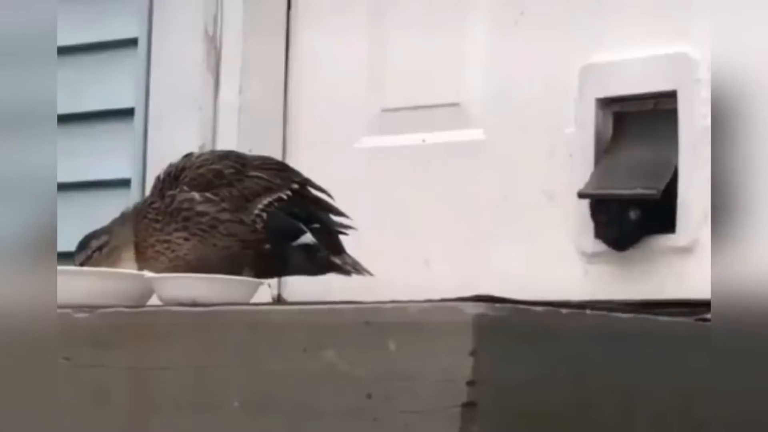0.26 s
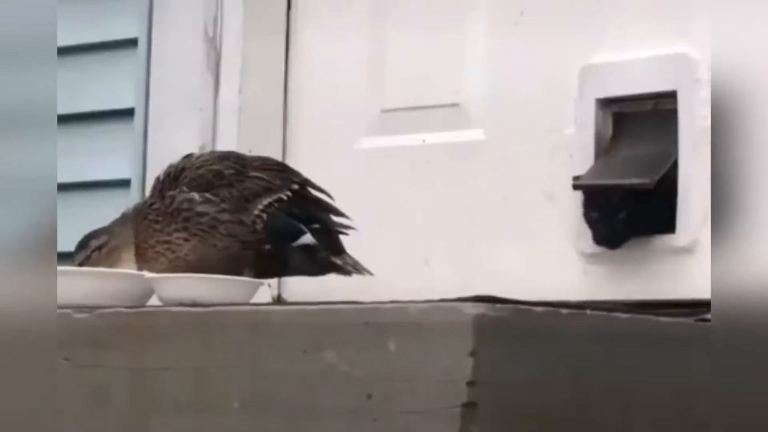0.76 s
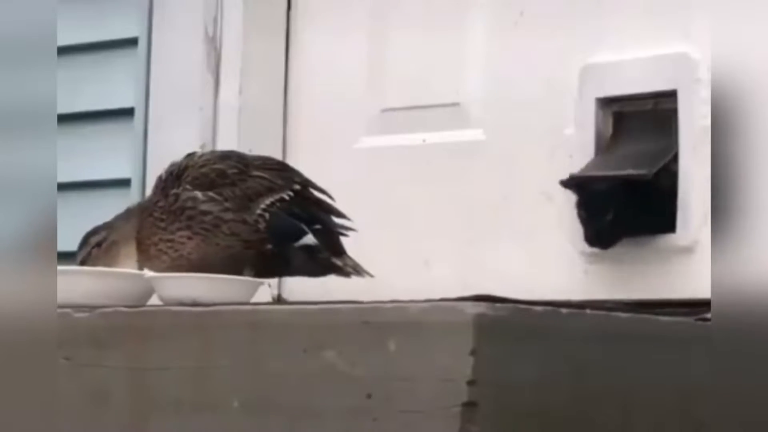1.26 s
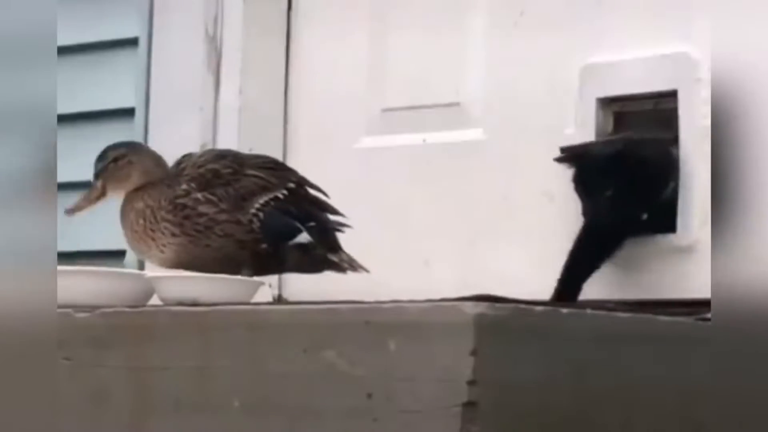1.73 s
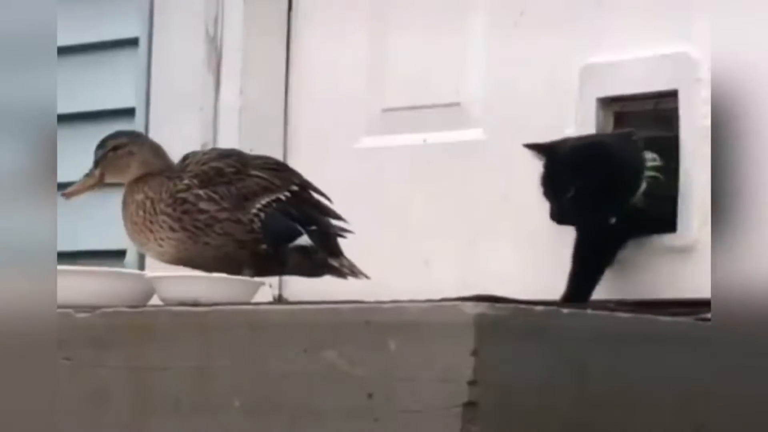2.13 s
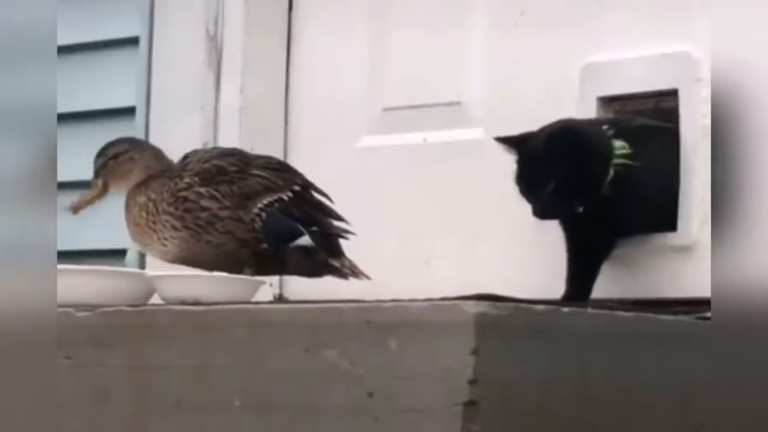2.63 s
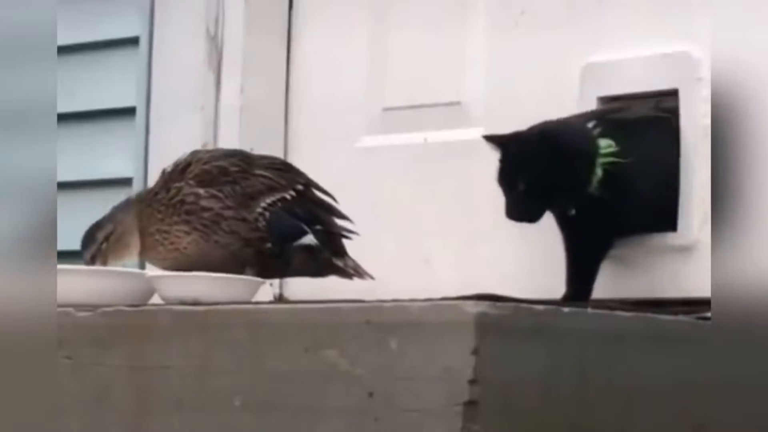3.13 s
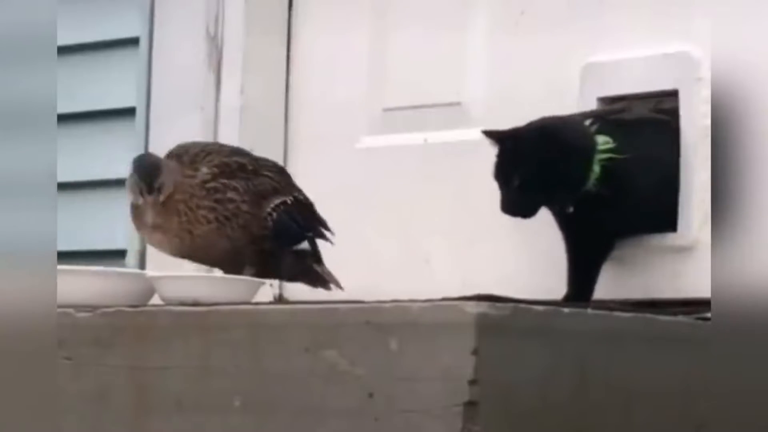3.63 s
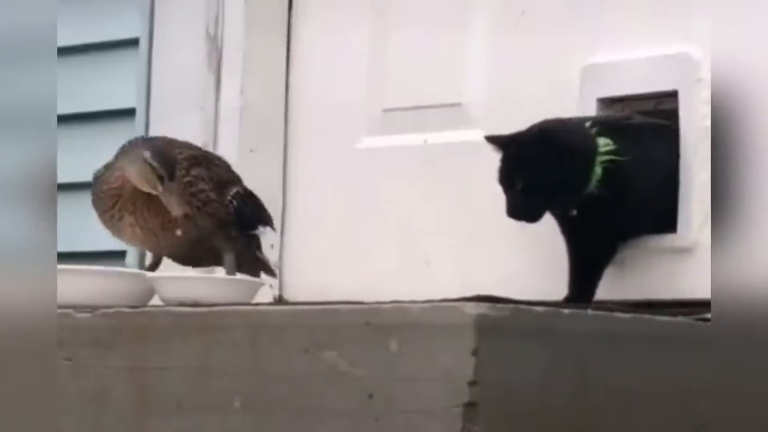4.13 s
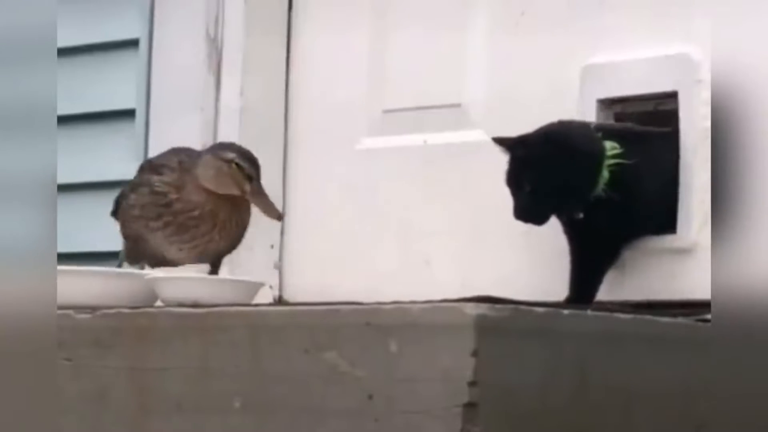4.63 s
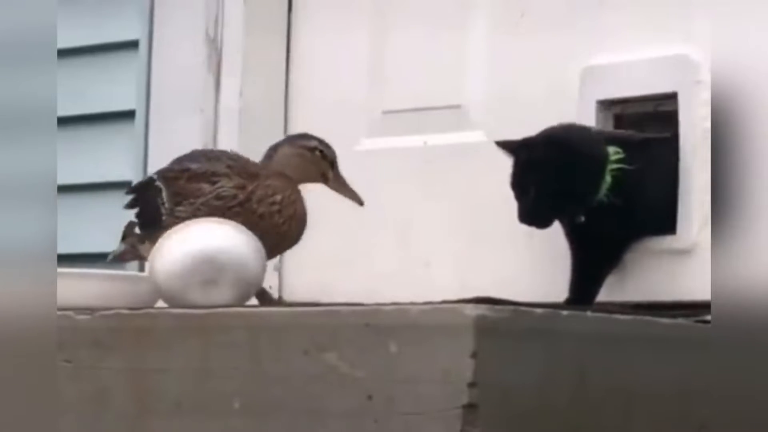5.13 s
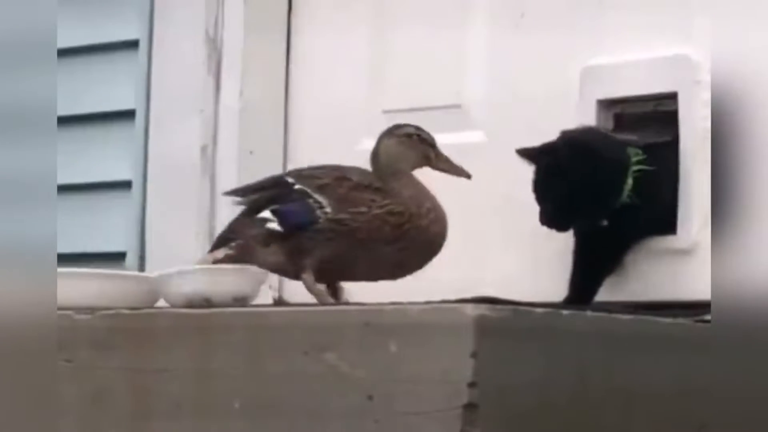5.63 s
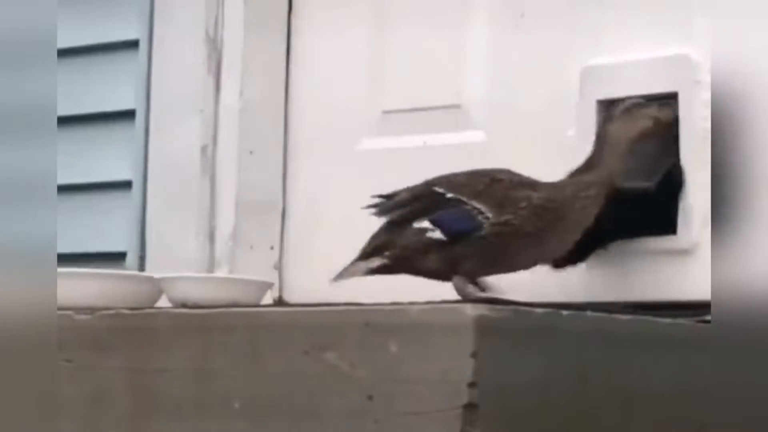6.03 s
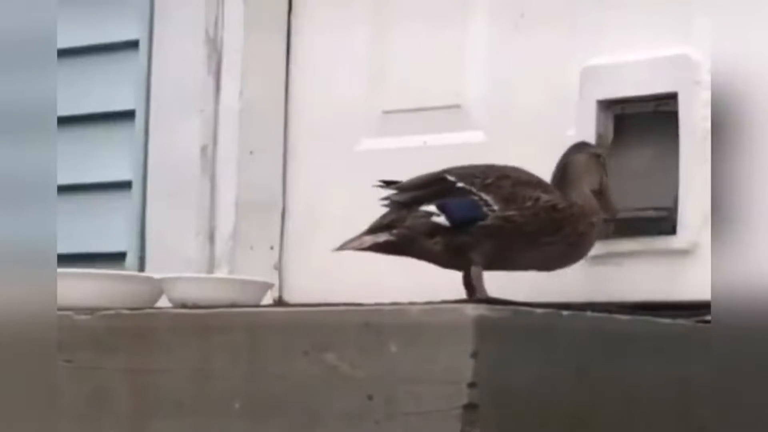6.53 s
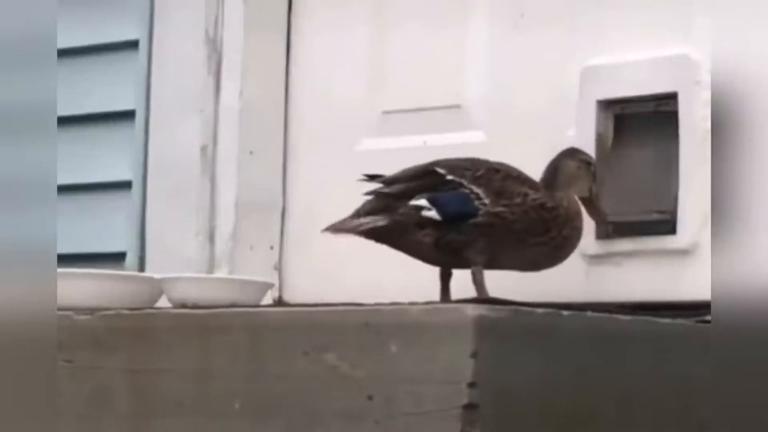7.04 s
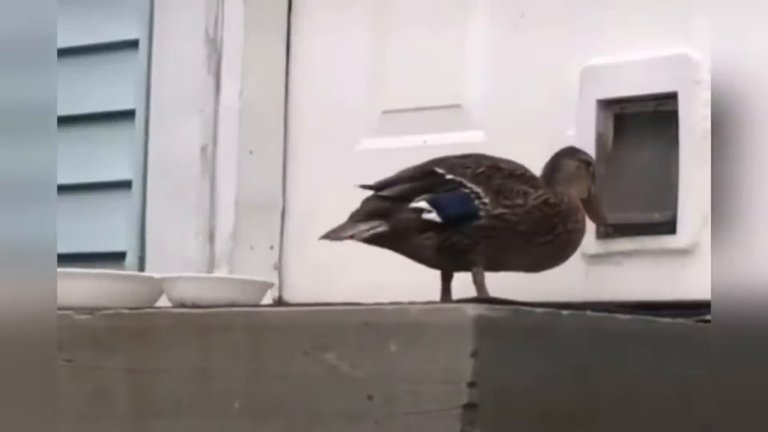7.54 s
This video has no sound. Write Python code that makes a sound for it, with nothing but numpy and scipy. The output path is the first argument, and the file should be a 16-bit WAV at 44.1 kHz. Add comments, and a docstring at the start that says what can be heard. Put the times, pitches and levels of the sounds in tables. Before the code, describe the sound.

Faint dabbling and soft dull taps come first, with a clean rising bird chip nearby and weaker calls farther off. Then a steel bowl is tipped and lands with a loud ringing clatter on the step. Heavy, flappy footsteps run forward, a collar tag tinkles, and a plastic pet door bangs and rattles with a low door thump. It settles into quiet outdoor rumble with small knocks. Close and nearly mono, with a little porch reflection.

```python
"""A duck dabbles in a steel bowl on a porch, treads on its rim so that it clangs and rolls, then runs at a cat.
The cat backs in through its plastic flap, which knocks shut in the door; the duck pecks at it.
A small bird chips nearby and others call farther off, over a low outdoor rumble and thin hiss.
Bowl, door and tag are damped modes, blows are bursts of coloured grains, rubbing is patchy noise,
and bird calls are gliding tones; random tails give the echoes of porch and yard."""
import sys
import numpy as np
from scipy import signal
from scipy.fft import rfft, irfft, next_fast_len
from scipy.io import wavfile
from scipy.ndimage import uniform_filter1d, map_coordinates

SR = 44100
rng = np.random.default_rng(int(sys.argv[2]) if len(sys.argv) > 2 else 0)


def generate_wav(sig):
    """Save sig (samples, or channels by samples) to the path in sys.argv[1] as 16-bit PCM at SR."""
    pcm = np.round(np.clip(np.atleast_2d(sig).T, -1, 1) * 32767).astype(np.int16)
    wavfile.write(sys.argv[1], SR, pcm)


N = 342921
T = np.arange(int(.7 * SR)) / SR  # time axis of one event [s]

# colour of blows on the bowl and the step: (frequency [Hz], gain [dB])
STEP_COLOUR = [(59, -32), (100, 2), (240, -2.5), (433, -9.5), (766, -5.5), (1380, -10.5), (2000, -15.5),
               (3460, -14.5), (4700, -23), (10800, -34), (13000, -41)]
# echo of the birds among the houses: (frequency [Hz], decay by 60 dB [s])
YARD_DECAY = [(2500, 0.14), (7000, 0.22), (13000, 0.3)]
# the cat rubbing along the frame: (time [s], length [s], relative level [dB])
SCUFF_STROKES = [(5.984, 0.061, -47.5), (6.03, 0.065, -54), (6.106, 0.075, -58), (6.184, 0.056, -55),
                 (6.222, 0.082, -50.5), (6.284, 0.11, -58.5)]
# colour of fur and claws on the frame: (frequency [Hz], gain [dB])
FUR_COLOUR = [(120, -18), (200, -1), (471, -10), (1150, -1), (1520, -5.5), (2840, -12), (3570, -5.5),
              (6460, -25), (7830, -18), (13000, -25)]


def amp(db):
    """Decibels to gain."""
    return 10 ** (np.asarray(db) / 20)


def unit(x):
    """Scale to rms 1."""
    return x / np.sqrt(np.mean(x ** 2) + 1e-20)


def along(points, hz):
    """Read (Hz, value) points on a log frequency axis."""
    f, v = np.transpose(points)
    return np.interp(np.log(hz + 1), np.log(f + 1), v)


def add(track, s, sound):
    """Mix a sound into the track at time s."""
    part = track[round(s * SR):][:len(sound)]
    part += sound[:len(part)]


def fade(t60):
    """Exponential decay, 60 dB in t60 seconds."""
    return np.exp(-np.log(1000) * T / max(t60, 1e-3))


def filtered(x, response):
    """Multiply the spectrum of x by a response of frequency."""
    m = next_fast_len(N + SR // 4)
    spectrum = rfft(x, m) * response(np.fft.rfftfreq(m, 1 / SR))
    return irfft(spectrum, m)[..., :N]


def noise(response):
    """Coloured noise of rms 1."""
    return unit(filtered(rng.standard_normal(N), response))


def wobble(rate):
    """A smooth random curve, rate knots a second."""
    knots = rng.standard_normal(int(N * rate / SR) + 4)
    return map_coordinates(knots, [np.arange(N) * rate / SR])


def patchy(x, db, bins, frames):
    """Give a noise patches of random gain in pitch and time."""
    z = signal.stft(x, nperseg=256)[2]
    field = uniform_filter1d(rng.standard_normal(z.shape), size=bins, axis=0)
    field = unit(uniform_filter1d(field, size=frames, axis=1))
    return unit(signal.istft(z * amp(db * field), nperseg=256)[1][:N])


def rub(response, catch_db, size=260, patchy_db=3):
    """Friction noise that catches and slips every few milliseconds, changing colour as it does."""
    catches = amp(catch_db * unit(uniform_filter1d(rng.standard_normal(N), size=size)))
    return unit(catches * patchy(noise(response), patchy_db, 5, 4))


def strokes(rows):
    """Level of rubbing strokes that swell and fade."""
    level = np.zeros(N)
    for s, length, db in rows:
        add(level, s, amp(db) * np.sin(np.pi * T[T < length] / length))
    return level


def ring(modes, hold=0):
    """Damped modes that die once the drive stops."""
    free = np.maximum(T - hold, 0)
    return sum(amp(db - 60 * free / t60) * np.sin(2 * np.pi * hz * T) for hz, db, t60 in modes)


def causal(gain):
    """The minimum-phase response with this gain: nothing sounds before the blow."""
    cepstrum = irfft(np.log(np.maximum(gain, 1e-6)))
    half = len(cepstrum) // 2
    cepstrum[1:half] *= 2
    cepstrum[half + 1:] = 0
    return np.exp(rfft(cepstrum))


def contacts(rows, colour, grit, thud_hz, snap_hz, ripple_db=4.0, ripple_hz=300, size=8192,
             grain_db=4, grain_hz=900):
    """Each contact is a push and a dying, grainy crunch, shared among thud, knock and snap."""
    track, hz = np.zeros(N), np.fft.rfftfreq(size, 1 / SR)
    low = 1 / (1 + (hz / thud_hz) ** 6)
    high = 1 - 1 / (1 + (hz / snap_hz) ** 6)
    weights = (low, (1 - low) * (1 - high), high)
    bands = np.array([causal(amp(along(colour, hz)) * weight) for weight in weights])
    for s, db, thud_db, snap_db, t60 in rows:
        knots = rng.standard_normal(size)
        grains = unit(amp(grain_db * np.interp(T[:size] * grain_hz, np.arange(size), knots)))
        force = grit * grains * rng.standard_normal(size) * fade(t60)[:size]
        force[0] += 1
        # each spot that is struck favours other resonances
        ripple = map_coordinates(rng.standard_normal(size), [hz / ripple_hz], order=1)
        parts = irfft(rfft(force) * causal(amp(ripple_db * ripple)) * bands)
        parts /= np.abs(parts).max(axis=1, keepdims=True)
        add(track, s, amp(db + np.array([thud_db, 0, snap_db])) @ parts)
    return track


def taps(rows, thud_db, t60, cushion):
    """Contacts from (s, dB, hardness dB): a hard one snaps, a soft one thuds."""
    return [(s, db, thud_db - cushion * hard_db, hard_db, t60) for s, db, hard_db in rows]


def porch(x, wet_db, width, decay=None):
    """Walls and yard answer with a decaying noise tail, almost alike at both microphone ports."""
    # echo of the porch: (frequency [Hz], decay by 60 dB [s])
    porch_decay = [(150, 1), (1000, 0.2), (7000, 0.18), (13000, 0.067)]
    if decay is None:
        decay = porch_decay
    hz, t, z = signal.stft(rng.standard_normal((2, SR // 2)), SR, nperseg=256)
    dying = amp(-60 * t / along(decay, hz)[:, None])
    mid, side = signal.istft(z * dying, SR, nperseg=256)[1]
    tails = np.array([mid + width * side, mid - width * side]) / np.linalg.norm(mid)
    return x + amp(wet_db) * signal.fftconvolve(x[None], tails, axes=1)[:, :N]


def spread(pair):
    """Turn the phase of the treble opposite ways at the two ports."""
    # close sounds reach the two ports out of step: (frequency [Hz], phase turn [dB re 1 radian])
    port_phase = [(3000, -63), (4300, -20.5), (7200, -10), (12000, -10.5)]
    return filtered(pair, lambda hz: np.exp(1j * np.outer([1, -1], amp(along(port_phase, hz)))))


def outdoors(split_hz=550, rumble_db=-58.5, hiss_db=-67, side_db=-15, wander_db=1.5):
    """Distant rumble and drone; a thin, patchy hiss lies above, with some side noise from about 4 to 8 kHz."""
    # colours of the rumble and of the hiss: (frequency [Hz], gain [dB])
    air_colour = [(15, -56), (25, -19.5), (37, -16.5), (59, -5), (75, -1), (97, -4.5), (202, -7.5),
                  (271, -14), (593, -19), (636, -14), (694, -17), (1600, -28.5), (2080, -60), (3520, -120)]
    hiss_colour = [(210, -35), (350, -6), (389, -2), (594, -9.5), (641, 1), (691, -10.5), (780, -8),
                   (1540, -15), (2660, -19), (2910, -18.5), (5740, -25), (10700, -25.5), (13000, -29)]
    side_colour = [(3300, -37.5), (4400, 6.0), (7800, 4.5), (9500, -17.0), (13000, -10.0)]
    # distant machinery: (frequency [Hz], half width [Hz], level [dB]); the first row also swells
    machinery = [(73, 8.6, -68.5), (635, 29, -81.5)]
    # the low drone swells once: (time [s], half length [s], rise [dB])
    drone_swell = (2.9, 0.77, 7)

    def low(hz):
        return 1 / np.sqrt(1 + (hz / split_hz) ** 6)

    rumble = noise(lambda hz: amp(along(air_colour, hz)) * low(hz))
    rumble = amp(rumble_db + wander_db * wobble(1.5)) * rumble
    hiss = noise(lambda hz: amp(along(hiss_colour, hz)) * np.sqrt(1 - low(hz) ** 2))
    hiss = patchy(hiss, 1.5, 6, 30)
    side = amp(side_db) * noise(lambda hz: amp(along(side_colour, hz)))
    hum, whine = [amp(db) * noise(lambda f: 1 / (1 + ((f - hz) / width) ** 2)) for hz, width, db in machinery]
    peak_s, half_s, swell_db = drone_swell
    swell = amp(swell_db * np.exp(-((np.arange(N) / SR - peak_s) / half_s) ** 2))
    waver_db = .5 * wobble(8)
    return rumble + swell * hum + whine + amp(hiss_db + waver_db) * np.array([hiss + side, hiss - side])


def duck():
    """Bill, dish, feet and plumage share the short echo of the porch."""
    hard = amp(1.5) * (pecks() + footsteps())
    return porch(hard + nibbles() + sifting() + rocking() + feathers(), wet_db=-11.0, width=0.024)


def nibbles(count=36, soft_db=-63, spread_db=2):
    """Soft dabbling: faint contacts scattered at random over the first seconds."""
    times = rng.uniform(0, 4.5, count)
    rows = [(s, soft_db + spread_db * z, -8, 1, .03) for s, z in zip(times, rng.standard_normal(count))]
    return contacts(rows, STEP_COLOUR, grit=0.18, thud_hz=490, snap_hz=2640)


def sifting():
    """The bill sifts through food and feathers brush: strokes of mostly low friction noise."""
    # (time [s], length [s], level [dB])
    sifts = [(.1, 0.38, -94), (1.268, 0.18, -64), (1.415, 0.084, -63.5), (2.877, 0.28, -68),
             (5.596, 0.34, -59.5), (6.663, 0.14, -66.5), (7.2, 0.18, -63)]
    colour = [(300, 3.0), (1200, 0.5), (2200, -9.5), (3300, -14.5), (6000, -19.5), (13000, -26.0)]
    return strokes(sifts) * rub(lambda hz: amp(along(colour, hz)), catch_db=6.5)


def pecks():
    """Bill and claws tap the dish; harder taps snap more and thud less."""
    # (time [s], relative level [dB], hardness [dB])
    bill_taps = [(.345, -66.5, 12), (.959, -47, -16), (1.438, -55.5, -20), (1.642, -61, 12.5),
                 (1.705, -50, 0), (2.132, -49.5, -12), (2.805, -53, -3), (3.054, -48.5, -1.5),
                 (3.098, -53, -26), (3.139, -46, -1.5), (3.236, -55.5, 5), (3.338, -61.5, 3),
                 (3.885, -67, 8), (4.377, -49, 0), (4.876, -59.5, 12), (5.005, -50.5, 5.5)]
    rows = taps(bill_taps, thud_db=-10.5, t60=.03, cushion=.17)
    return contacts(rows, STEP_COLOUR, grit=0.2, thud_hz=477, snap_hz=2450)


def cat_at_flap():
    """The cat scrapes back through the frame, its tag clinks, and the flap knocks and shakes the door."""
    close = tag() + brushing() + scrape() + knocking() + door()
    return porch(close, wet_db=-18.5, width=0.0038)


def tag():
    """The metal tag on the cat's collar clinks: two high modes, damped more or less each time."""
    # (time [s], relative level [dB], share of its free ring time)
    clinks = [(1.461, -56, .4), (1.486, -51, 0.6), (1.518, -48, .3), (1.529, -52, .4), (6.0195, -35.5, .7),
              (6.047, -38, 0.83), (6.061, -48, .5), (6.076, -44, .2)]
    # (frequency [Hz], relative level [dB], free decay by 60 dB [s])
    tag_modes = [(6240, -5.5, 0.14), (6210, -22, 0.047)]
    track = np.zeros(N)
    for s, db, free in clinks:
        add(track, s, amp(db) * ring([(hz, level, t60 * free) for hz, level, t60 in tag_modes]))
    return track


def birds():
    """Chips and ticks close by, and fainter slurs that are mostly echo."""
    return chips() + far_birds() + ticks()


def chips(start_hz=5050, ceiling_hz=8050, bend=.5, rasp_hz=100, lobes=3,
          overtone_db=-15, lobe_depth=0.26, body_db=-3.0, rise=0.78):
    """Quick, clean chips shoot up in pitch and level off, pulse and stop short; their whole sweep echoes."""
    # the nearest birds: (time [s], length [s], relative level [dB], echo [dB])
    calls = [(1.536, 0.028, -44, -1.5), (2.925, 0.032, -46, -3.5), (4.276, 0.0255, -32, -8.5)]
    near = np.zeros((2, N))
    for s, length, db, echo_db in calls:
        u, call, direct = T[T < length] / length, np.zeros(N), np.zeros(N)
        # bend is a share of the call's length
        pitch = ceiling_hz - (ceiling_hz - start_hz) * np.exp(-u / bend)
        pitch += rasp_hz * wobble(700)[:len(u)]
        phase = 2 * np.pi * np.cumsum(pitch) / SR
        edges = np.minimum(10 * np.minimum(u, 1 - u), 1)
        sweep = amp(db + body_db) * edges * (np.sin(phase) + amp(overtone_db) * np.sin(2 * phase))
        pulses = 1 - lobe_depth * np.cos(2 * np.pi * lobes * u)
        add(call, s, sweep)
        add(direct, s, sweep * np.minimum(2 * u, 1) ** rise * pulses)
        echo = porch(call, wet_db=echo_db, width=0.021, decay=YARD_DECAY) - call
        near += direct + echo
    return near


def far_birds(count=10, faint_db=-63, faint_fall=0.13, faint_hz=3100, faint_s=0.016):
    """Birds farther off: set slurs and a random scatter of faint ones, their echo stronger than the call."""
    # (time [s], length [s], middle pitch [Hz], relative level [dB], fall as a share of the pitch)
    far_calls = [(1.823, 0.0079, 2940, -46.5, 0.43), (1.84, .019, 4150, -55, 0.051),
                 (1.855, 0.045, 8260, -60.5, -0.27), (2.088, 0.012, 5570, -48, 0.77),
                 (2.155, .035, 5430, -56, 0.65), (2.195, 0.009, 3040, -51, 0.27),
                 (2.33, .012, 3050, -59, 0.19), (2.44, .014, 2990, -61, .1),
                 (2.58, 0.013, 3000, -56, -0.14), (2.846, 0.011, 2970, -55.5, .15),
                 (3.525, 0.0092, 3830, -50.5, 0.11), (3.56, 0.011, 2840, -55.5, 0.26),
                 (3.652, .01, 3500, -63, 0.23), (3.705, 0.026, 4480, -55, 0.33),
                 (3.905, 0.011, 4290, -53, 0.29), (3.99, 0.026, 3590, -59, -0.13),
                 (4.246, 0.0039, 4680, -49, .1), (4.585, 0.036, 2110, -52.5, 0.34),
                 (5.826, 0.014, 2290, -57, 0.023)]
    faint = [(2 + 2 * when, faint_s, faint_hz * 1.4 ** (pitch - .5), faint_db, faint_fall)
             for when, pitch in rng.random((count, 2))]
    return porch(amp(-11.0) * slurs(far_calls + faint), wet_db=5.0, width=0.017, decay=YARD_DECAY)


def slurs(rows, quaver=0.039):
    """Short quavering whistles that fall through their pitch by the share fall, or rise if it is negative."""
    track = np.zeros(N)
    for s, length, hz, db, fall in rows:
        u = T[T < length] / length
        flutter = np.interp(u, np.linspace(0, 1, 12), rng.standard_normal(12))
        pitch = hz * (1 + fall * (.5 - u) + quaver * flutter)
        add(track, s, amp(db) * np.sin(np.pi * u) * np.sin(2 * np.pi * np.cumsum(pitch) / SR))
    return track


def rocking():
    """The dish rocks dully on the step: three low, quickly damped modes."""
    # (time [s], relative level [dB])
    rocks = [(3.458, -53), (3.501, -47), (5.769, -47)]
    # (frequency [Hz], relative level [dB], decay by 60 dB [s])
    rock_modes = [(964, 2.5, 0.014), (1060, -2.5, 0.027), (423, -2, 0.029)]
    track = np.zeros(N)
    for s, db in rocks:
        add(track, s, amp(db) * ring(rock_modes))
    return track


def bowl():
    """The bowl clangs, chatters on the step and sings while it rolls."""
    steel = porch(clangs() + rolling(), wet_db=-37.5, width=0.055)
    return steel + porch(amp(-0.5) * (skids() + chatter()), wet_db=-24.0, width=0.028)


def skids():
    """The rim skids briefly over the step: bright, catching friction noise."""
    # (time [s], length [s], relative level [dB])
    skid_strokes = [(3.882, .035, -59), (4.866, .03, -57.5), (4.96, 0.043, -64.5), (5.0, 0.033, -71),
                    (5.305, 0.051, -61.5), (5.435, 0.024, -66)]
    # (frequency [Hz], gain [dB])
    skid_colour = [(1500, -7), (3500, 0), (5500, -0.5), (7500, -4), (9000, -1.5), (12000, -4.5),
                   (13000, -10)]
    friction = rub(lambda hz: amp(along(skid_colour, hz)), catch_db=4.5, size=120, patchy_db=4)
    return strokes(skid_strokes) * friction


def clangs(attack=0.0007, centre_hz=2800, linger_db=-17, linger=3.25):
    """Blows ring the steel modes, which shift in pitch and level as the bowl lifts off the step."""
    # (time [s], relative level [dB], tilt [dB per octave], time the skidding rim keeps it going [s])
    blows = [(3.885, -70, 17, .002), (5.1068, -21, 1.5, 0.024)]
    # modes: (frequency [Hz], relative level [dB], main decay by 60 dB [s],
    # fall in pitch when lifted off the step [Hz], change in level when lifted [dB])
    bowl_modes = [(2822, 1.5, .18, 56, 0), (4273, -12, .15, 34, -7), (3783, -22, .16, 0, 11),
                  (2036, -17, .07, -20, -4), (832, -24, .15, 0, 0), (1012, -20, .15, 20, 0),
                  (1064, -22, .2, 0, 0), (1378, -25, .09, 0, 0), (1604, -23, .08, 0, 0),
                  (1730, -21, .11, 0, 0), (2460, -22, .1, 0, 0), (3023, -15, .07, 0, 0),
                  (3128, -16, .07, 0, 0), (3395, -16, .11, 0, 0), (3702, -18, .08, 0, 0),
                  (4380, -22, .09, 0, 0), (5012, -33, .11, 0, 0), (5938, -30, .1, 80, 3),
                  (8393, -34, .13, 0, 0), (8895, -22, .1, 0, 0), (9030, -26, .12, 0, 0),
                  (10320, -25, .1, 0, 0), (11920, -26, .11, 0, 0)]
    # the bowl tips up: (time [s], share lifted off the step)
    lift = [(5.14, 0.056), (5.195, 0.9), (5.25, 0.99), (5.32, 0.66)]
    steel = np.zeros(N)
    for s, db, tilt_db, hold in blows:
        free = np.maximum(T - hold, 0)
        lifted = np.interp(s + T, *np.transpose(lift))
        for hz, level, t60, fall_hz, lift_db in bowl_modes:
            # the step damps most of the ring quickly; a small part lingers
            decay = amp(-60 * free / t60) + amp(linger_db - 60 * free / (linger * t60))
            tone = amp(lift_db * lifted) * singing(hz - fall_hz * lifted)
            gain = amp(db + level + tilt_db * np.log2(hz / centre_hz))
            add(steel, s, gain * (1 - np.exp(-T / attack)) * decay * tone)
    return steel


def singing(hz):
    """One mode of the bowl, made unsteady by the rim grinding on the step."""
    # (catches per second [1/s], level swing [dB], phase swing [radians])
    grind = (110, 0.78, .16)
    rate, swing_db, swing = grind
    knots = rng.standard_normal((2, len(T)))
    level, phase = [np.interp(T * rate, np.arange(len(T)), k) for k in knots]
    turns = np.cumsum(hz * np.ones(len(T))) / SR
    return amp(swing_db * level) * np.sin(2 * np.pi * turns + swing * phase)


def rolling(tip_s=4.877, roll_s=5.1951, swell_cycles=167, fade_cycles=710, fade_power=1.62,
            centre_hz=3800, ping_hz=5900, ping_attack=0.001, tip_attack=0.0047):
    """The tipped bowl rings; a few modes swell as it rolls, and light touches of the rim ping."""
    # modes of the free bowl: (frequency [Hz], level as it rolls [dB], level as the foot first tips it [dB])
    free_modes = [(1487, -55.5, -72), (2058, -60, -73), (2740, -53, -48.5), (3790, -38.5, -66),
                  (4237, -56, -53), (5840, -54, -48), (7500, -69, -56), (8500, -56, -66), (8861, -62, -58)]
    # light touches of the rim: (time [s], relative level [dB], tilt [dB per octave])
    pings = [(5.008, -59.5, -18), (5.018, -58.5, -16), (5.311, -46, -2), (5.451, -63, 2), (5.567, -76, -40),
             (5.753, -73, -37)]
    # (frequency [Hz], relative level [dB], decay by 60 dB [s])
    ping_modes = [(3460, -12, 0.085), (5940, 2.5, 0.066), (8600, -11.5, 0.13)]
    steel = np.zeros(N)
    for hz, db, tip_db in free_modes:
        # low modes rise and die most slowly
        rise = swell_cycles / hz
        t60 = fade_cycles / centre_hz * (centre_hz / hz) ** fade_power
        swell = np.sin(np.pi / 2 * np.minimum(T / rise, 1)) * amp(-60 * np.maximum(T - rise, 0) / t60)
        add(steel, roll_s, amp(db) * swell * singing(hz))
        add(steel, tip_s, amp(tip_db) * (1 - np.exp(-T / tip_attack)) * fade(t60) * singing(hz))
    for s, db, tilt_db in pings:
        modes = [(hz, level + tilt_db * np.log2(hz / ping_hz), t60) for hz, level, t60 in ping_modes]
        add(steel, s, amp(db) * (1 - np.exp(-T / ping_attack)) * ring(modes))
    return steel


def chatter():
    """The rim clatters on the step, less brightly once the tipped bowl lands on its rounded lip."""
    # (frequency [Hz], gain [dB])
    rim_colour = [(88, -58), (150, -27.5), (311, -35.5), (1030, -12.5), (1870, -23), (2050, -9.5),
                  (2560, -26.5), (2870, -8.5), (3120, -6.5), (3550, -16), (4010, -18.5), (4400, -18),
                  (5020, -28.5), (8310, -23), (8780, -22), (12300, -30), (13000, -70)]
    clatter = contacts(skips(), rim_colour, grit=0.15, thud_hz=590, snap_hz=2498)
    tipped = np.interp(np.arange(N) / SR, [5.16, 5.18], [0, 1])
    treble = filtered(clatter, lambda hz: np.clip((hz - 4200) / 1500, 0, 1))
    return clatter - 0.69 * tipped * treble


def skips(count=2, skip_s=.0068, scatter_s=.0015, skip_db=-13, bright_db=6.5, thud_db=-24,
          blow_t60=0.021, skip_t60=.055):
    """Each landing is one blow and a run of lighter, brighter skips."""
    # the rim lands on the step: (time [s], relative level [dB], snap [dB], loss per skip [dB])
    landings = [(5.108, -9, -6, 4), (5.1145, -20, -3.5, 3), (5.1201, -16.5, -4.5, -1.5),
                (5.129, -22.5, -3, -3.5), (5.138, -26, 0, 3), (5.145, -30, -13.5, 4), (5.166, -35, -12, 1),
                (5.1803, -24.5, -26, 4), (5.1952, -24, -4, 10), (5.2008, -32.5, 3, 6),
                (5.205, -26.5, -16, 9), (5.2097, -28, 0.5, 3), (5.2135, -28.5, -4, 13), (5.218, -40, 4, 8),
                (5.311, -51, 10, 1), (5.352, -50, -1, 6)]
    rows = []
    for s, db, snap_db, loss_db in landings:
        rows.append((s, db, thud_db, snap_db, blow_t60))
        for k, z in enumerate(rng.standard_normal(count), 1):
            late = k * skip_s + scatter_s * z
            rows.append((s + late, db + skip_db - k * loss_db, thud_db, snap_db + bright_db, skip_t60))
    return rows


def footsteps(web_s=0.0079, boom_s=5.571):
    """Webbed feet run over the step: each lands, then its web slaps; one heavy footfall booms."""
    # (time [s], relative level [dB], hardness [dB], slap of the web relative to the foot [dB])
    feet = [(5.488, -48.5, 1, -16), (5.558, -52, -6, -17), (5.566, -39, -25, -16), (5.612, -43.5, -4, -22),
            (5.637, -52, -12, -3), (5.667, -52, -4, -11), (5.699, -56, -3, -12), (5.744, -46.5, -6, 4),
            (5.7878, -42.5, -11, 0), (5.7924, -41.5, -7, -15), (5.9137, -37.5, -11.5, -3.5),
            (5.972, -46, -3.5, -5)]
    # boom in the step: (frequency [Hz], level [dB], decay by 60 dB [s])
    foot_thud = (160, -38.5, 0.07)
    falls = [(s + late, db + softer, hard_db) for s, db, hard_db, web_db in feet
             for late, softer in [(0, 0), (web_s, web_db)]]
    rows = taps(falls, thud_db=-12, t60=0.022, cushion=0.43)
    track = contacts(rows, STEP_COLOUR, grit=0.25, thud_hz=470, snap_hz=2330)
    # the duck's mix raises the steps by 1.5 dB, but not the boom
    add(track, boom_s, amp(-1.5) * ring([foot_thud]))
    return track


def feathers():
    """Plumage rustles as the duck runs and brushes the door: strokes of friction noise."""
    # (time [s], length [s], level [dB])
    rustles = [(5.625, .1, -69.5), (5.722, 0.047, -64), (5.775, 0.051, -62), (6.215, 0.098, -55.5),
               (7.25, 0.13, -66)]
    # (frequency [Hz], gain [dB])
    plumage = [(500, -9), (1200, 4), (3500, 0), (5800, -4), (8000, -15), (13000, -14)]
    return strokes(rustles) * rub(lambda hz: amp(along(plumage, hz)), catch_db=3)


def knocking():
    """The plastic flap knocks in its frame with grainy blows."""
    # (frequency [Hz], gain [dB])
    plastic = [(59, -21), (100, -16), (212, -4), (408, -3), (600, -5.5), (866, -4.5), (999, -2),
               (1660, -17), (2600, -15), (3460, -7.5), (4990, -18.5), (5530, -17.5), (7350, -24),
               (8830, -21), (10800, -34), (13000, -25)]
    return contacts(rattles(), plastic, grit=0.22, thud_hz=570, snap_hz=2620)


def rattles(snap_db=-7, dull=0.12, firm_db=-30, loosen=0.19, tick_db=-6, tick_snap_db=6, tick_thud_db=-5,
            rebound_s=.011, rebound_db=-11, t60=0.025, tick_t60=0.035, rebound_t60=0.096):
    """Tick, knock and rebound; the harder the knock, the more the flap rattles."""
    # (time [s], relative level [dB], thud [dB], lead of the tick as the loose flap takes up its play [s])
    knocks = [(5.987, -41.5, -5, 0.0025), (6.022, -39, -7, 0.0022), (6.0941, -27.5, -8, 0.0048),
              (6.1093, -38.5, 7, 0.00089), (6.1844, -28.5, 1.5, .0072), (6.194, -40, -4, 0.0025),
              (6.238, -46, -18, 0.0046), (6.308, -49.5, 13, 0.0018), (6.5436, -49.5, 15, 0.0039),
              (6.746, -44, -10, 0.0058), (7.11, -53.5, -4, 0.007)]
    rows = []
    for s, db, thud_db, play_s in knocks:
        rattle_db = db + loosen * (db - firm_db)
        hard_db = snap_db - dull * thud_db
        rows.append((s - play_s, rattle_db + tick_db, tick_thud_db, tick_snap_db, tick_t60))
        rows.append((s, db, thud_db, hard_db, t60))
        rows.append((s + rebound_s, rattle_db + rebound_db, thud_db, hard_db, rebound_t60))
    return rows


def brushing():
    """The cat's fur rubs along the frame and sets its resonances ringing."""
    friction = rub(lambda hz: amp(along(FUR_COLOUR, hz)) * frame(hz), catch_db=-1.5, size=200)
    return amp(-1.0) * strokes(SCUFF_STROKES) * friction


def frame(hz, ring_db=7):
    """Gain of the frame, which rings when it is rubbed."""
    # resonances of the plastic: (frequency [Hz], width [Hz], relative level [dB])
    resonances = [(765, 38, 4), (1210, 250, -9), (1700, 63, -10), (2236, 43, 3), (3200, 40, -14),
                  (3500, 110, -14)]
    peaks = sum(amp(db) / (1 + (2 * (hz - centre) / width) ** 2) for centre, width, db in resonances)
    return 1 + amp(ring_db) * peaks


def scrape(count=60, slip_db=2, spread_db=2):
    """Claws and collar catch on the frame in separate slips, as hard as the cat is rubbing."""
    level = strokes(SCUFF_STROKES)
    start, end = SCUFF_STROKES[0][0], SCUFF_STROKES[-1][0] + SCUFF_STROKES[-1][1]
    rows = []
    for k, (late, size, hard) in enumerate(rng.standard_normal((count, 3))):
        s = start + (end - start) * (k + .5 * late) / count
        rub_db = 20 * np.log10(level[round(s * SR)] + 1e-6)
        rows.append((s, rub_db + slip_db + spread_db * size, -4, -4 + 4 * hard, .012))
    return contacts(rows, FUR_COLOUR, grit=0.087, thud_hz=500, snap_hz=2400, ripple_db=4)


def door(lag_cycles=1.2):
    """Heavy pushes shake the door; low panel modes build up more slowly, so the boom falls in pitch."""
    # (time [s], relative level [dB], pitch ratio)
    thumps = [(6.026, -45, 1.1), (6.111, -29, 0.94), (6.141, -33.5, .72), (6.183, -34.5, 1.03)]
    # modes at pitch ratio 1: (frequency [Hz], relative level [dB], decay by 60 dB [s])
    door_modes = [(93.8, -3, 0.21), (126.7, 0, 0.21), (170.3, -3.5, 0.15), (229.3, -4.5, 0.16),
                  (281.6, 1, 0.12), (407, -7, 0.18), (507, -10, .11), (620, -19, .11), (1030, -23, 0.06)]
    track = np.zeros(N)
    for s, db, ratio in thumps:
        for hz, level, t60 in door_modes:
            rise = lag_cycles / (hz * ratio)
            boom = ring([(hz * ratio, level, t60 / ratio ** 2)], hold=rise)
            add(track, s, amp(db - 6.0) * (1 - np.exp(-T / rise)) * boom)
    return track


def ticks(start_s=6.48, gap_s=0.0082, hz=6740, first_db=-41.5, loss_db=2, length=0.0052, fall=.99):
    """A sharp triple tick from a bird close by: three very short, steeply falling whistles."""
    rows = [(start_s + k * gap_s, length, hz, first_db - k * loss_db, fall) for k in range(3)]
    return porch(slurs(rows, quaver=0.143), wet_db=-6.0, width=0.032)


def scene():
    """Everything on the porch: close sounds spread over the ports, birds and outdoors around them."""
    return outdoors() + spread(duck() + cat_at_flap() + bowl()) + birds()


def record(dry, top_hz=13250):
    """The microphone keeps nothing above its band limit."""
    return filtered(dry, lambda hz: np.clip((top_hz - hz) / 200 + .5, 0, 1))


dry = scene()
out = record(dry)
generate_wav(out)
```